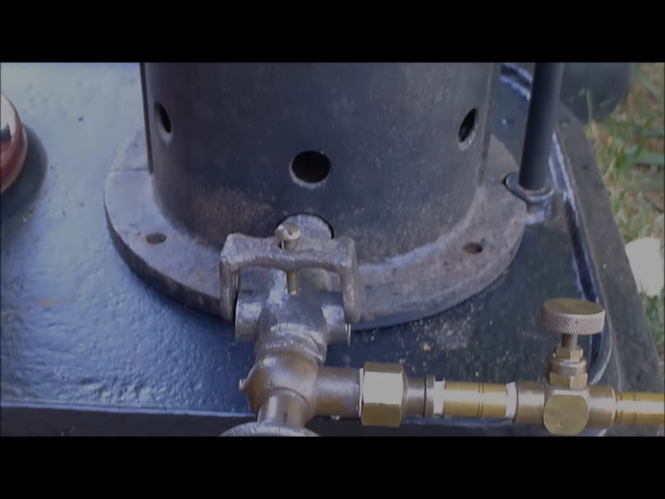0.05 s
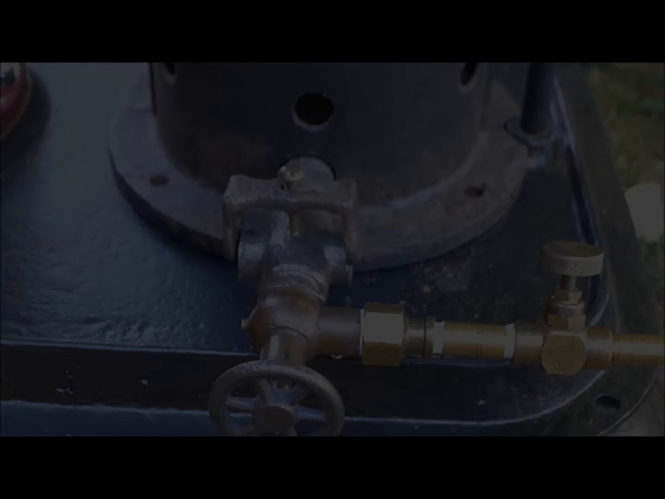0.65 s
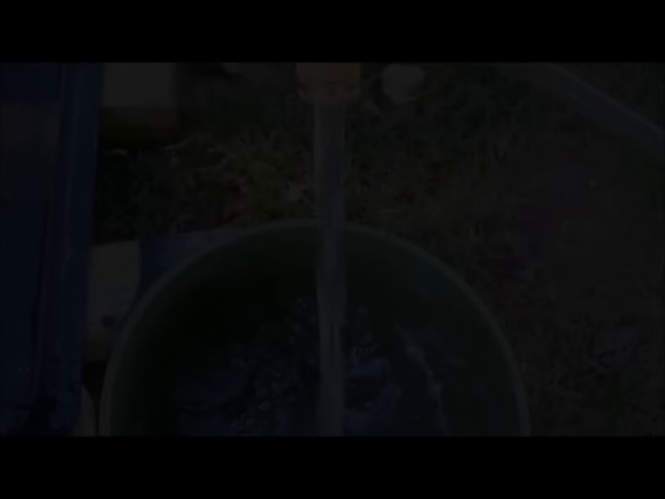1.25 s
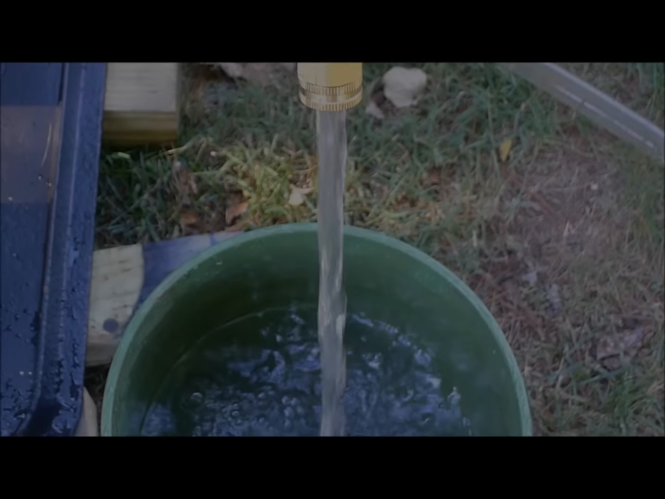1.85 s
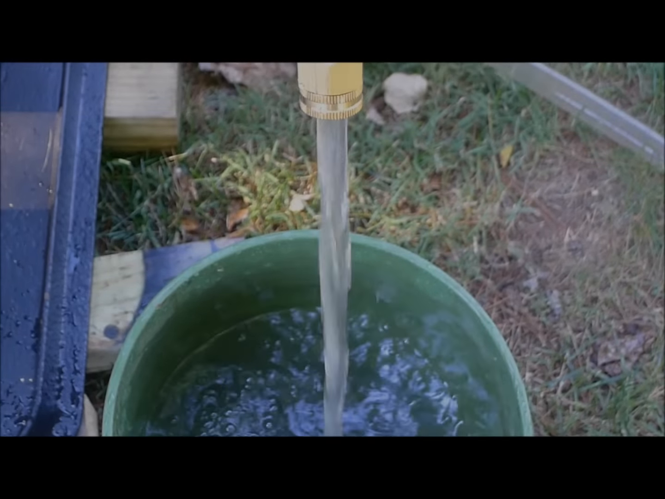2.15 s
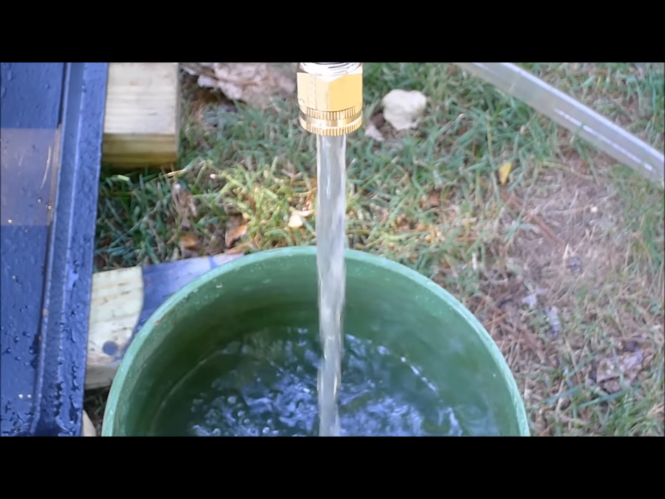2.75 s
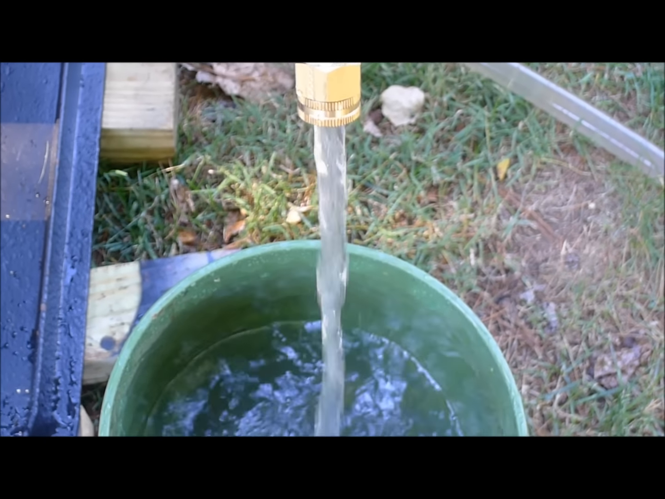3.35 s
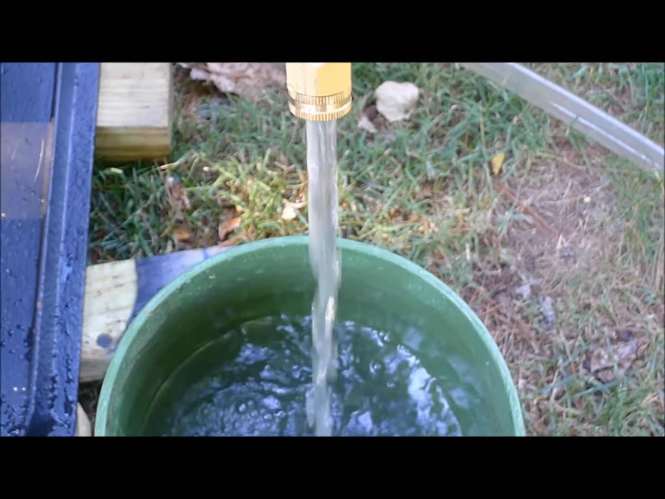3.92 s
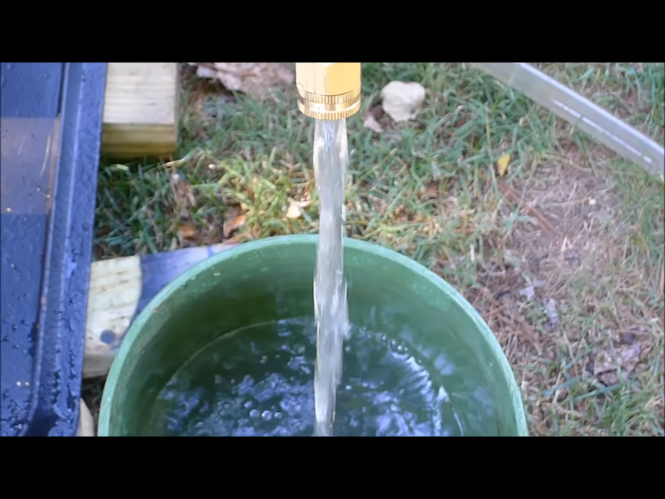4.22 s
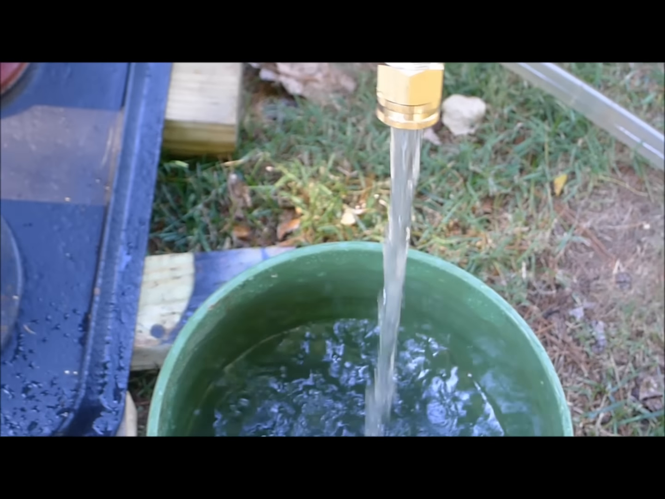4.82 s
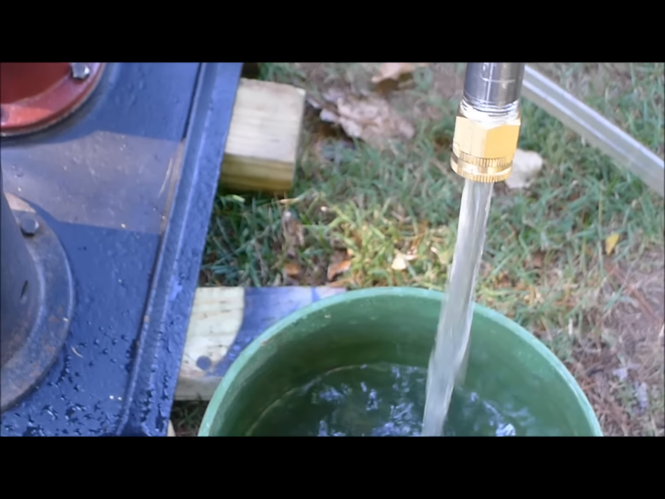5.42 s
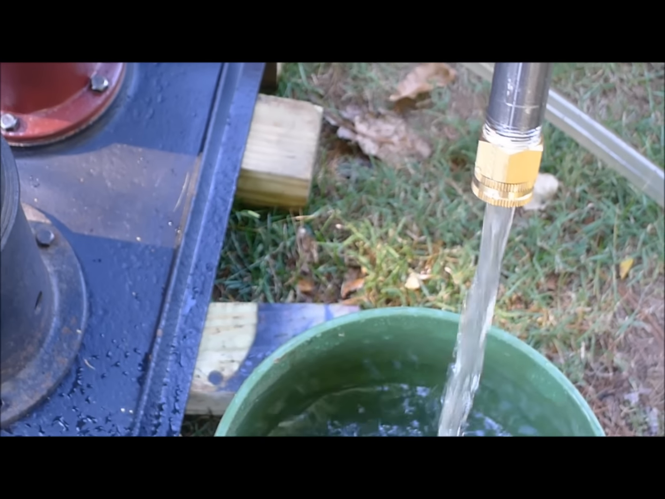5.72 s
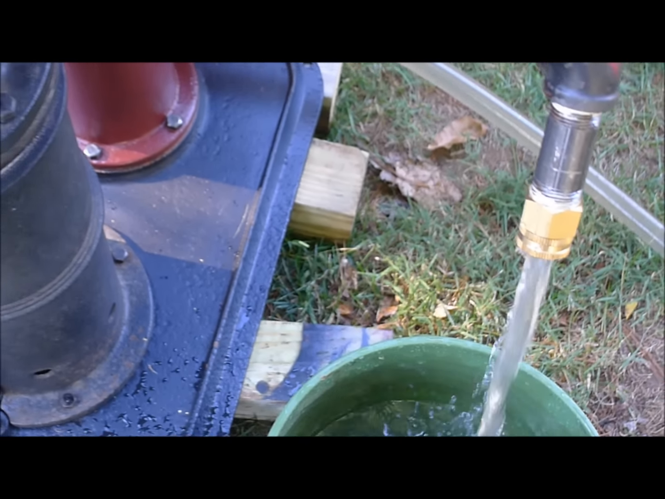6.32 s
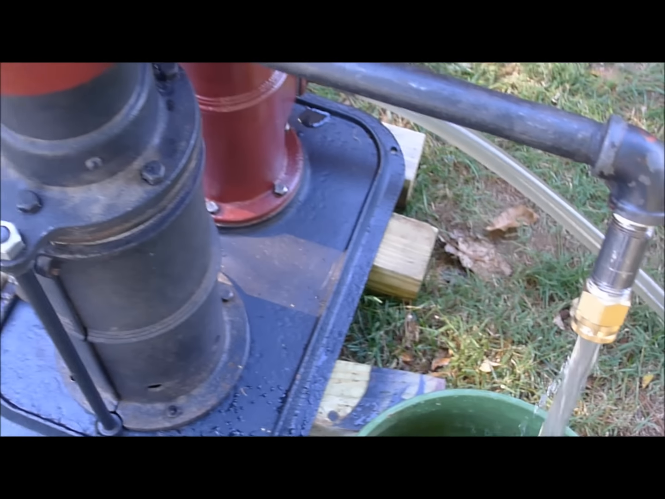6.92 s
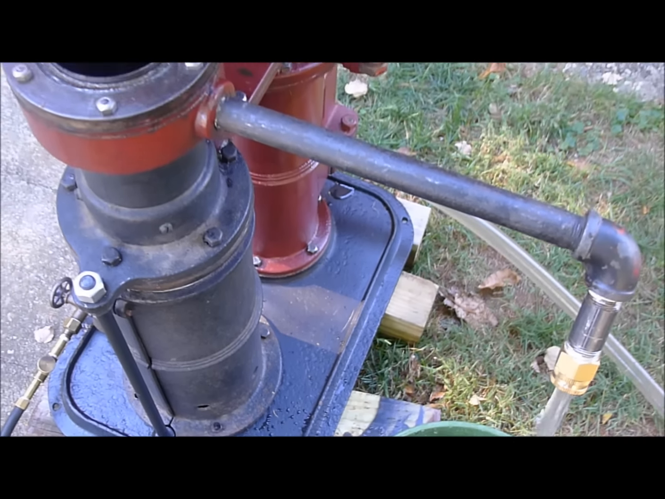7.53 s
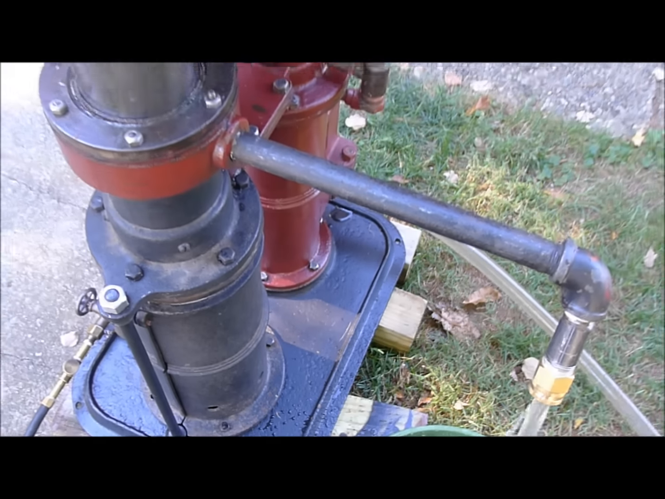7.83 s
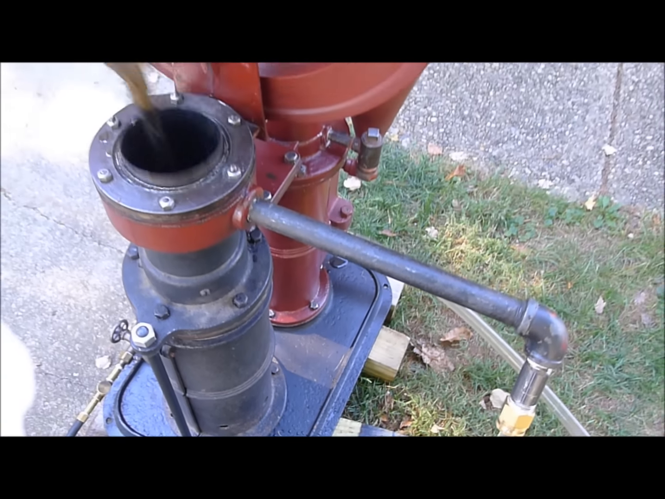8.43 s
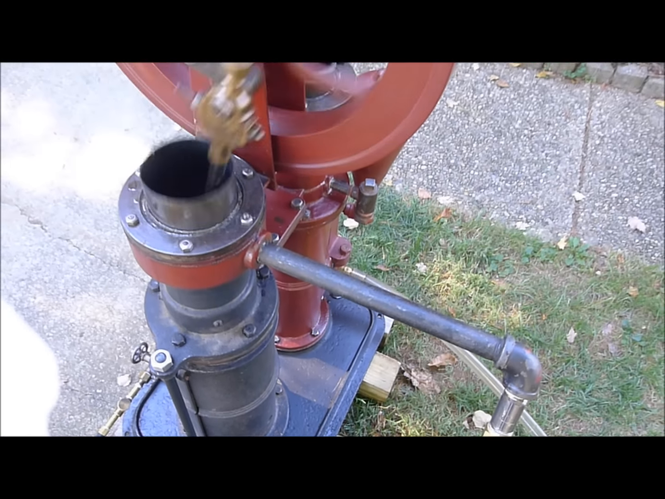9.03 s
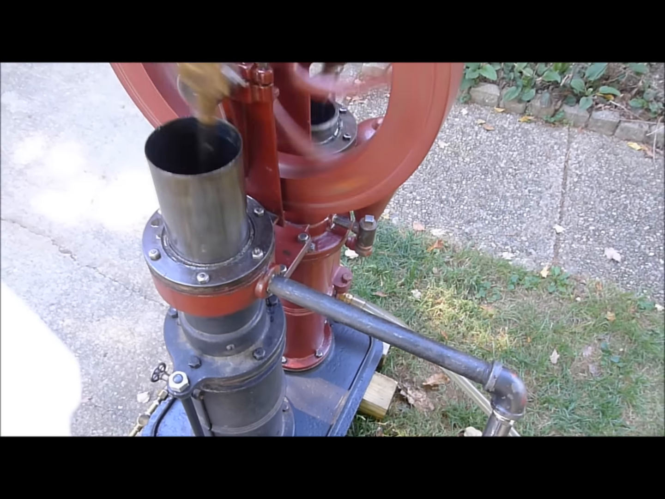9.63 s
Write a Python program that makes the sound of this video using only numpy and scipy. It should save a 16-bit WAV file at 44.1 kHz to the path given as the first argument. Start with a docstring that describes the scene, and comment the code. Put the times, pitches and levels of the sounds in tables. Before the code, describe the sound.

Water splashes into a bucket as a small old pumping engine clacks and knocks quickly, fading out briefly, then growing louder.

```python
"""On a lawn, an antique hot-air engine turns about twice a second and pumps water into a plastic bucket. Each
turn five loose joints strike and ring the iron frame, the pump throbs and the piston hisses. The stream surges
with spray, bubbles and drops, over a low rumble and a far hum. The sound fades out beside the base; the scene
changes to the bucket, the sound fades back in and grows as the listener nears the linkage."""
import sys
import numpy as np
from scipy import signal
from scipy.fft import rfft, irfft, next_fast_len
from scipy.io import wavfile
from scipy.ndimage import uniform_filter1d

SR = 44100
rng = np.random.default_rng(int(sys.argv[2]) if len(sys.argv) > 2 else 0)


def pcm_store(signal):
    """Save signal as 16-bit PCM."""
    levels = np.round(np.clip(np.atleast_2d(signal), -1, 1) * 32767)
    wavfile.write(sys.argv[1], SR, levels.astype(np.int16).T)


N = 426447
TIME_S = np.arange(N) / SR
SCENE_CHANGE_S = 1.24  # the scene changes from base to bucket, in silence
TURN_S, QUICKEN_S = .48185, .000128  # first flywheel period, shortening per turn
TAP_S, THUD_S, KNOCK_S, CLANK_S = .064, .161, .300, .393  # after the clack
MIX_DB = -46.5
BASE_ENGINE_DB, BASE_PUMP_DB, BASE_WATER_DB = -10, -12, -13.5  # offsets beside the base

# Nearness to the moving parts: time_s, gain_db
NEARNESS = [(2, 0.5), (4.8, 2.5), (5.5, 1), (6.25, 0.6), (7.1, 4.5), (8.7, 5.5), (9.67, 7.5)]
# Outdoor rumble spectrum: freq_hz, level_db
RUMBLE_SPECTRUM = [(20, -22), (38, -37), (52, -9), (66, -7), (90, -10), (108, 0), (126, -10), (150, -11),
                   (182, 0.5), (260, -14.5), (600, -9.5), (4000, -31.5)]
# Far hum: pitch_hz, level_db, swell_db, swell_peak_s
HUM_TONES = [(89.5, -71.5, 3.5, 7), (125.3, -73.5, 13, 8.42), (178.8, -72, 9, 6.07)]
# Iron modes driven by rubbing: pitch_hz, width_hz, level_db
RUBBED_MODES = [(1992, 27, -10.5), (2610, 100, -2.5), (3280, 120, 0.5)]
# Spray spectrum: freq_hz, level_db
SPRAY_SPECTRUM = [(100, -25), (200, -1), (370, 6.5), (540, -2.5), (700, 0), (1050, -3), (1600, -8),
                  (2800, -5), (4500, -4.5), (5600, -9.5), (7000, -11), (10000, -15.5), (15500, -20.5)]
# Flow sags at piston reversals and surges between: after_clack_s, gain_db, half_width_s
FLOW_SWINGS = [(0.04, -1, 0.014), (0.137, 1.5, .022), (0.243, -2.5, .018), (.275, 1.5, .012),
               (.36, -2, .025), (.44, 1, .025)]
# Cast-iron frame spectrum: freq_hz, level_db
FRAME_SPECTRUM = [(40, -32), (150, -8), (270, -4), (400, 1), (540, -7.5), (690, 0.5), (1000, -10),
                  (1450, 0.5), (2200, -10), (3000, -1.5), (4500, -6), (6000, -15), (9000, -21),
                  (15000, -40.5)]
# Frame decay: freq_hz, t60_s
FRAME_DECAY = [(300, 0.16), (700, 0.14), (2000, 0.044), (5000, 0.013), (12000, 0.011)]
# Modes of the struck parts: pitch_hz, level_db, t60_s
CLACK_MODES = [(684, -13, 0.065), (1247, -12, 0.099), (1557, -12, 0.078), (2038, -2.5, 0.07),
               (2550, -5, 0.022), (3294, -6.5, 0.014), (6380, -10.5, 0.054), (8300, -16.5, 0.023),
               (9250, -14, 0.021)]
TAP_MODES = [(645, -24, 0.06), (1520, -24, 0.011), (2020, -10, 0.019)]
THUD_MODES = [(684, -4, 0.11), (891, -6, 0.15), (1331, -3.5, 0.065), (2630, -1, 0.027), (3158, -1.5, 0.026)]
KNOCK_MODES = [(684, -5.5, 0.33), (1260, -9, 0.078), (1476, -21, 0.083), (1950, -8, 0.074),
               (2553, -5.5, 0.037)]
CLANK_MODES = [(438, -9.5, 0.083), (721, -5.5, 0.075), (1197, -7, 0.082), (2980, -7.5, 0.026),
               (5350, -12, 0.018)]
EXTRA_STRIKE_MODES = [(1222, -11, 0.048), (3030, -4.5, 0.013)]
# Harder or softer blows: time_s, gain_db
ACCENTS = [(.053, -11), (3.905, 1), (4.386, -1), (5.348, -1), (6.309, 2), (6.79, 0.5), (7.75, 1),
           (8.23, 0.5), (9.029, -0.5)]
# Extra sharp iron strikes, many reinforcing regular blows, some between them: start_s, level_db
EXTRA_STRIKES = [(.0435, 2.5), (.1175, -0.5), (.176, -9), (.198, -2), (.352, -3), (.417, -1), (.484, -0.5),
                 (.5985, -4), (.66, -6), (.685, 1), (.838, -2), (.946, 3), (5.4845, -1.5), (5.9625, 2),
                 (5.977, -7), (6.3085, -1), (6.627, -5), (7.0185, -1), (7.098, -4), (7.271, -3.5),
                 (7.4995, -3), (7.802, -3), (7.893, 1.5), (8.061, -2), (8.364, -1), (8.516, -0.5),
                 (8.711, -1), (9.601, -6), (9.665, 1)]
# Largest drops: start_s, level_db, pitch_hz, rise_ms
PLINKS = [(.117, -35, 2600, 0.35), (.138, -50, 4300, 1), (.598, -45.5, 2520, 0.52), (.793, -57, 3070, 3.8),
          (.9, -55, 2000, .9), (2.075, -40.5, 4980, .5), (2.554, -40, 4240, 0.26), (2.71, -39, 4000, .6),
          (3.0185, -35, 5740, 0.3), (3.337, -33, 4300, 0.64), (3.818, -45, 1780, 3),
          (3.857, -33, 4860, 0.87), (3.891, -39, 5130, 0.27), (3.9198, -28.5, 4350, 0.5),
          (4.123, -32, 3790, 0.9), (4.35, -43, 4460, 0.28), (4.669, -34, 4660, .3), (4.677, -41, 1850, 2.8),
          (4.80, -39, 1835, 1.8), (4.84, -43, 4650, .25), (4.9736, -30.5, 4000, 0.32),
          (5.247, -29, 4390, 0.63), (5.321, -39, 13600, 0.3), (5.343, -35, 1700, 1.5),
          (5.7619, -31.5, 4100, 0.54), (5.812, -38, 8770, 0.34), (5.838, -26, 4230, 0.49),
          (5.935, -37.5, 3340, 1.8), (6.415, -40, 2290, 2.5), (6.499, -34.5, 2620, 1.4),
          (6.663, -38.5, 3460, 1.9), (6.686, -37.5, 2230, 4.1), (6.707, -34.5, 1970, 2.2),
          (6.807, -33, 4030, 0.69), (6.901, -37, 11740, 0.28), (7.1655, -32, 3080, 1.6),
          (7.4296, -36, 4700, 0.66), (7.907, -26.5, 4860, 0.95), (7.9325, -29.5, 3080, 1.1),
          (8.293, -34, 5200, 1.4), (8.336, -32, 3300, 1.3), (8.67, -41, 8770, .4),
          (8.826, -35.5, 2800, 1.6), (9.096, -26, 1746, 1.1), (9.245, -34.5, 1630, 2.1),
          (9.2607, -30, 5500, .7), (9.294, -29.5, 6070, 0.5), (9.303, -30, 2900, 0.87),
          (9.442, -31.5, 3530, 2.8), (9.546, -27, 5100, 1.04), (9.602, -25, 5800, 0.32),
          (9.627, -37, 1014, 2)]
# Throbs of pump and base, each turn: after_thud_s, length_s, pitch_hz, level_db
THROBS = [(-.082, 0.032, 286, -0.5), (-.055, 0.042, 243, -0.5), (-.03, 0.021, 282, -8.5),
          (.002, 0.037, 214, -2.5), (.001, 0.019, 275, 1), (0.016, 0.021, 280, -0.5),
          (0.066, 0.027, 250, -8), (0.121, 0.033, 265, -9), (0.153, .042, 265, -2), (.229, 0.04, 281, -6),
          (0.225, 0.05, 355, -10.5), (0.314, 0.038, 370, -8)]
# Hollow gurgles: start_s, length_s, pitch_hz, level_db
GURGLES = [(7.508, 0.05, 330, 2.5), (7.557, 0.018, 360, 6.5), (7.973, 0.045, 358, 1.5)]
# Piston hiss and cylinder air puff spectra: freq_hz, level_db
HISS_SPECTRUM = [(11000, -34), (13100, -15), (13700, 2), (14150, -4), (15500, -24)]
PUFF_SPECTRUM = [(500, -15), (1500, 0), (4000, 1), (8000, -2.5), (15000, -13)]
# Boomier, screened tone beside the base: freq_hz, gain_db
BASE_EQ = [(100, 3), (180, 0), (270, 2.5), (380, -2), (510, 9.5), (700, 1), (1080, 3), (1500, -1.5),
           (2000, 3), (3000, -3), (4700, -4.5), (7000, -0.5), (12000, -2.5)]
# Base plate modes: pitch_hz, width_hz, level_db
PLATE_MODES = [(856, 18, -4), (1184, 16, 5.5), (1880, 19.7, -5)]


def amp(db):
    """Decibels to gain."""
    return 10 ** (np.asarray(db) / 20)


def unit_rms(x):
    """Scale to rms 1."""
    return x / np.sqrt(np.mean(x ** 2) + 1e-20)


def at_hz(table, hz):
    """Interpolate on a log frequency axis."""
    freq_hz, value = np.transpose(table)
    return np.interp(np.log(hz + 1), np.log(freq_hz), value)


def add(mix, start_s, sound):
    """Mix in at start_s."""
    start = round(start_s * SR)
    part = mix[max(start, 0):max(start + len(sound), 0)]
    part += sound[max(-start, 0):][:len(part)]


def equalise(x, spectrum):
    """Apply a gain curve over frequency."""
    return irfft(rfft(x) * amp(at_hz(spectrum, np.fft.rfftfreq(len(x), 1 / SR))), len(x))


def noise(spectrum):
    """Coloured noise, rms 1."""
    return unit_rms(equalise(rng.standard_normal(N), spectrum))


def wander(shape, span):
    """Noise smoothed over span points, rms 1."""
    return unit_rms(uniform_filter1d(rng.standard_normal(shape), size=span))


def fade(silent_from_s=1.16, silent_to_s=1.33, full_s=6.22):
    """Gain: down to silence at the base, up again at the bucket."""
    falling = np.clip(1 - TIME_S / silent_from_s, 0, 1) ** 0.78
    rising = np.clip((TIME_S - silent_to_s) / (full_s - silent_to_s), 0, 1) ** 0.73
    return falling + rising


def listener_gain(base_db, nearness_share=1):
    """Faded source gain: a set offset at the base, then following nearness."""
    near_db = nearness_share * np.interp(TIME_S, *np.transpose(NEARNESS))
    return fade() * amp(MIX_DB + np.where(TIME_S < SCENE_CHANGE_S, base_db, near_db))


def clack_times(first_base_s=.053, first_bucket_s=1.336):
    """Start of each turn as the engine picks up."""
    turn = np.arange(19)
    elapsed_s = turn * TURN_S - QUICKEN_S * turn ** 2 / 2
    base_s, bucket_s = first_base_s + elapsed_s, first_bucket_s + elapsed_s
    return np.r_[base_s[base_s < SCENE_CHANGE_S], bucket_s[bucket_s < N / SR]]


def background(rumble_db=-22, waver_hz=2.44, wander_db=2.5, swell_half_width_s=0.75):
    """Outdoor rumble and a far hum; each tone wavers and swells once."""
    out = amp(rumble_db) * listener_gain(BASE_ENGINE_DB) * noise(RUMBLE_SPECTRUM)
    hum_gain = fade() * amp(BASE_ENGINE_DB * (TIME_S < SCENE_CHANGE_S))
    for hz, db, swell_db, peak_s in HUM_TONES:
        swell = np.exp(-((TIME_S - peak_s) / swell_half_width_s) ** 2)
        pitch_drift, level_drift = wander((2, N), 8000)
        tone = np.sin(2 * np.pi * np.cumsum(hz + waver_hz * pitch_drift) / SR)
        out += hum_gain * amp(db + swell_db * swell + wander_db * level_drift) * tone
    return out


def resonate(x, hz, width_hz):
    """One driven mode."""
    return signal.lfilter(*signal.iirpeak(hz, hz / width_hz, SR), x)


def rubbing(level_db=-21, spread_db=3):
    """Bearing and piston friction keeps the iron ringing between blows."""
    friction = rng.standard_normal(N) * amp(spread_db * wander(N, 2500))
    rings = (amp(db) * unit_rms(resonate(friction, hz, width_hz)) for hz, width_hz, db in RUBBED_MODES)
    return amp(level_db) * sum(rings)


def spray(patch_db=2.5, flicker_db=3.0):
    """Dense spray, clumped in time and frequency."""
    bins = signal.stft(rng.standard_normal(N), nperseg=256, noverlap=192)[2]
    patches = uniform_filter1d(rng.standard_normal(bins.shape), size=8, axis=0)
    patches = unit_rms(uniform_filter1d(patches, size=8, axis=1))
    bins *= amp(patch_db * patches + flicker_db * wander(bins.shape[1], 6))
    clumped = signal.istft(bins, nperseg=256, noverlap=192)[1][:N]
    return unit_rms(equalise(clumped, SPRAY_SPECTRUM))


def splat(hz, rise_s, rough=0.39, log_width=0.22, glide=0.047, tail_db=-18, tail_s=0.0066, size=2048):
    """A drop lands: one bubble glides up among smaller ones; the bucket wall scatters a tail."""
    t, freq_hz = np.arange(size) / SR, np.fft.rfftfreq(size, 1 / SR)
    rolloff = 1 + (np.log((freq_hz + 1) / hz) / log_width) ** 2
    cluster = unit_rms(irfft(rfft(rng.standard_normal(size)) / rolloff))
    envelope = t / rise_s * np.exp(1 - t / rise_s)
    pitch_hz = hz * (1 + glide * np.tanh((t / rise_s - 1) / 2))
    bubble = np.sin(2 * np.pi * np.cumsum(pitch_hz) / SR)
    tail = amp(tail_db) * (1 - np.exp(-t / rise_s)) * np.exp(-t / tail_s)
    return envelope * ((1 - rough) * bubble + rough * cluster) + tail * cluster


def bubbles(flow, per_s=950, spread_db=4.5, low_hz=1350, high_hz=5500, tilt_db_oct=2, bands=64):
    """Swarms of small splats, denser as the flow surges."""
    out = np.zeros(N)
    for hz in np.geomspace(low_hz, high_hz, bands):
        births = np.flatnonzero(rng.random(N, dtype=np.float32) < flow * per_s / bands / SR)
        sizes_db = spread_db * np.minimum(rng.exponential(1, 1024), 3.5)
        rise_cycles = 2.5 * rng.uniform(0.98, 1.57)
        ring = amp(tilt_db_oct * np.log2(hz / high_hz)) * splat(hz, rise_cycles / hz)
        for birth, db in zip(births, sizes_db):
            add(out, birth / SR, amp(db) * ring)
    return unit_rms(out)


def scatter(flow, per_s, low_hz, high_hz, spread_db, max_spreads):
    """Random events, rate scaled by flow squared: start_s, pitch_hz, level_db."""
    births = np.flatnonzero(rng.random(N) < flow ** 2 * per_s / SR)
    for birth, (pitch, size) in zip(births, rng.random((len(births), 2))):
        level_db = spread_db * min(-np.log(1 - size), max_spreads)
        yield birth / SR, low_hz * (high_hz / low_hz) ** pitch, level_db


def chirps(flow, rise_cycles=5):
    """Larger bubbles ring clean as the stream drags them under."""
    out = np.zeros(N)
    for s, hz, db in scatter(flow, per_s=75, low_hz=1600, high_hz=4200, spread_db=3.5, max_spreads=2):
        add(out, s, amp(db) * splat(hz, rise_cycles / hz, rough=.12, glide=.08))
    return unit_rms(out)


def droplets(flow):
    """The finest drops tick on the surface."""
    out = np.zeros(N)
    for s, hz, db in scatter(flow, per_s=70, low_hz=5000, high_hz=13300, spread_db=3.2, max_spreads=2.6):
        add(out, s, amp(db) * splat(hz, rise_s=0.00033, rough=0.66, log_width=0.25))
    return unit_rms(out)


def stream(spray_db=-4.5, bubbles_db=-8.0, chirps_db=-16.0, droplets_db=-17, stroke_spread_db=0.18):
    """Water falls into the bucket, sagging and surging; each stroke lifts a little more or less."""
    clacks_s = clack_times()
    since_s = TIME_S - clacks_s[np.maximum(np.searchsorted(clacks_s, TIME_S) - 1, 0)]
    shortfall_db = np.interp(TIME_S, clacks_s, stroke_spread_db * rng.standard_normal(len(clacks_s)))
    swing_db = sum(db * np.exp(-((since_s - s) / width_s) ** 2) for s, db, width_s in FLOW_SWINGS)
    flow = amp(swing_db - shortfall_db)
    return flow * (amp(spray_db) * spray() + amp(bubbles_db) * bubbles(flow)
                   + amp(chirps_db) * chirps(flow) + amp(droplets_db) * droplets(flow))


def frame_ring(tilt_db_oct, crack_db, crack_s=0.00097, size=8192):
    """A dry crack and the iron frame's dense modes."""
    hz, t, bins = signal.stft(rng.standard_normal(size), SR, nperseg=256)
    bins *= amp(-60 * t / at_hz(FRAME_DECAY, hz)[:, None])
    ring = signal.istft(bins, SR, nperseg=256)[1][:size]
    ring *= 1 + amp(crack_db) * np.exp(-np.arange(size) / SR / crack_s)
    tilted = [(f, db + tilt_db_oct * np.log2(f / 1500)) for f, db in FRAME_SPECTRUM]
    ring = equalise(ring, tilted) * np.linspace(1, 0, size)
    return ring / np.linalg.norm(ring)


def joint_ring(modes, spread_db=1.5, detune_hz=14, size=8192):
    """A joint's clear modes; level and pitch shift with where it lands."""
    t, ring = np.arange(size) / SR, np.zeros(size)
    for (hz, db, t60_s), (sharp, loud) in zip(modes, rng.standard_normal((len(modes), 2))):
        mode = amp(-60 * t / t60_s) * np.sin(2 * np.pi * (hz + detune_hz * sharp) * t)
        ring += amp(db + spread_db * loud) * mode / np.linalg.norm(mode)
    return ring


def joint(blows, modes, level_db, tilt_db_oct, crack_db, chatter_s, chatter_db, cushion_s=0.00014):
    """A loose joint strikes and chatters as it seats; oil cushions the attack."""
    out, t = np.zeros(N), np.arange(1500) / SR
    common_ring = frame_ring(tilt_db_oct, crack_db)
    for start_s, db in blows:
        chatter = rng.standard_normal(len(t)) ** 3 * np.exp(-t / chatter_s)
        contact = amp(chatter_db) * chatter / np.linalg.norm(chatter)
        contact[0] += 1  # first impact
        ring = common_ring + frame_ring(tilt_db_oct, crack_db) + joint_ring(modes)
        blow = signal.fftconvolve(contact, ring)
        blow *= 1 - np.exp(-np.arange(len(blow)) / SR / cushion_s)
        add(out, start_s, amp(db + level_db) * blow / np.linalg.norm(blow))
    return out


def each_turn(after_s, jitter_s, spread_db, base_db=0):
    """One uneven blow per turn: start_s, level_db."""
    due_s = clack_times() + after_s
    late, loud = rng.standard_normal((len(due_s), 2)).T
    accent_db = sum(db * (abs(due_s - s) < .02) for s, db in ACCENTS)
    return np.c_[due_s + jitter_s * late, spread_db * loud + accent_db + base_db * (due_s < SCENE_CHANGE_S)]


def linkage(lead_s=0.011, lead_db=-4.0, rebound_s=.019, rebound_db=-7, highpass_hz=130):
    """Five joints take up slack in turn, plus extra strikes; the clack doubles, the thud rebounds."""
    clacks = each_turn(0, jitter_s=.0003, spread_db=1.74, base_db=-4.5)
    taps = each_turn(TAP_S, jitter_s=.004, spread_db=3.5)
    thuds = each_turn(THUD_S, jitter_s=.00052, spread_db=0, base_db=-1.5)
    knocks = each_turn(KNOCK_S, jitter_s=.0004, spread_db=1.9)
    clanks = each_turn(CLANK_S, jitter_s=.0004, spread_db=0.5, base_db=3.5)
    clacks = np.r_[clacks, clacks + (-lead_s, lead_db)]
    thuds = np.r_[thuds, thuds + (rebound_s, rebound_db)]
    out = joint(clacks, CLACK_MODES, level_db=31.5, tilt_db_oct=2.5, crack_db=0,
                chatter_s=.0032, chatter_db=-3)
    out += joint(taps, TAP_MODES, level_db=28, tilt_db_oct=2, crack_db=-4,
                 chatter_s=.025, chatter_db=12)
    out += joint(thuds, THUD_MODES, level_db=28, tilt_db_oct=-1.5, crack_db=3.5,
                 chatter_s=.006, chatter_db=-8)
    out += joint(knocks, KNOCK_MODES, level_db=28.5, tilt_db_oct=0.8, crack_db=-13,
                 chatter_s=.0091, chatter_db=-2)
    out += joint(clanks, CLANK_MODES, level_db=29, tilt_db_oct=3.6, crack_db=2,
                 chatter_s=.0086, chatter_db=-2.5)
    out += joint(EXTRA_STRIKES, EXTRA_STRIKE_MODES, level_db=27, tilt_db_oct=-1.5, crack_db=12,
                 chatter_s=.0022, chatter_db=-0.5)
    # the small frame radiates little bass
    return signal.sosfilt(signal.butter(3, highpass_hz, "high", fs=SR, output="sos"), out)


def plinks(level_db=-1):
    """Large drops land singly."""
    out = np.zeros(N)
    for start_s, db, hz, rise_ms in PLINKS:
        add(out, start_s, amp(db + level_db) * splat(hz, rise_ms * 1e-3))
    return out


def throb(length_s, hz, db, sag=0.045):
    """A low resonance swells, sinks in pitch and dies."""
    progress = np.linspace(0, 1, max(round(length_s * SR), 8))
    cycles = hz * length_s * (progress + sag * (progress - progress ** 2))
    return amp(db) * np.sin(np.pi * progress ** 0.61) * np.sin(2 * np.pi * cycles)


def pump(spread_db=1.5, detune=0.019, jitter_s=0.00095):
    """One slightly varied run of throbs per turn, plus a few gurgles."""
    out = np.zeros(N)
    for thud_s in clack_times() + THUD_S:
        for after_s, length_s, hz, db in THROBS:
            late, sharp, loud = rng.standard_normal(3)
            pulse = throb(length_s, hz * (1 + detune * sharp), db + spread_db * loud)
            add(out, thud_s + after_s + jitter_s * late, pulse)
    for start_s, length_s, hz, db in GURGLES:
        add(out, start_s, throb(length_s, hz, db))
    return out


def piston(hiss_db=-18, puff_db=-1, lead_s=0.05, length_s=0.022, spread_db=2.7):
    """The piston slides before each thud: an air puff at the base, a thin hiss from the bucket."""
    gate, window = np.zeros(N), np.hanning(round(length_s * SR))
    for thud_s in clack_times() + THUD_S:
        stroke_db = spread_db * rng.standard_normal() * (thud_s > SCENE_CHANGE_S)
        add(gate, thud_s - lead_s, amp(stroke_db) * window)
    hiss = amp(hiss_db) * noise(HISS_SPECTRUM)
    puff = amp(puff_db) * noise(PUFF_SPECTRUM)
    return gate * np.where(TIME_S < SCENE_CHANGE_S, puff, hiss)


def beside_base(sound):
    """Low by the base the iron booms and the plate rings."""
    padded = np.r_[sound, np.zeros(next_fast_len(N + SR) - N)]
    boomy = equalise(padded, BASE_EQ)[:N]
    return boomy + sum(amp(db) * resonate(boomy, hz, width_hz) for hz, width_hz, db in PLATE_MODES)


def scene():
    """Mono mix, base then bucket; on approach the water grows less than the clatter."""
    engine = listener_gain(BASE_ENGINE_DB) * (linkage() + piston() + rubbing())
    throbs = listener_gain(BASE_PUMP_DB) * pump()
    water = listener_gain(BASE_WATER_DB, nearness_share=0.62) * stream() + plinks()
    mix = engine + throbs + water + background()
    return np.where(TIME_S < SCENE_CHANGE_S, beside_base(mix), mix)[None]


def record(dry):
    """Narrow treble notch, steep band limit."""
    notch_hz, notch_q, cutoff_hz = 7460, 20, 15800
    notched = signal.lfilter(*signal.iirnotch(notch_hz, notch_q, SR), dry)
    lowpass = signal.firwin(511, cutoff_hz, window=("kaiser", 9), fs=SR)
    return signal.oaconvolve(notched, lowpass[None], "same")


dry = scene()
out = record(dry)
pcm_store(out)
```